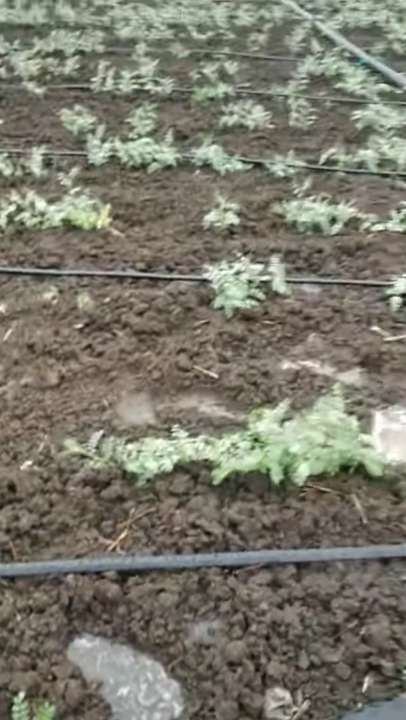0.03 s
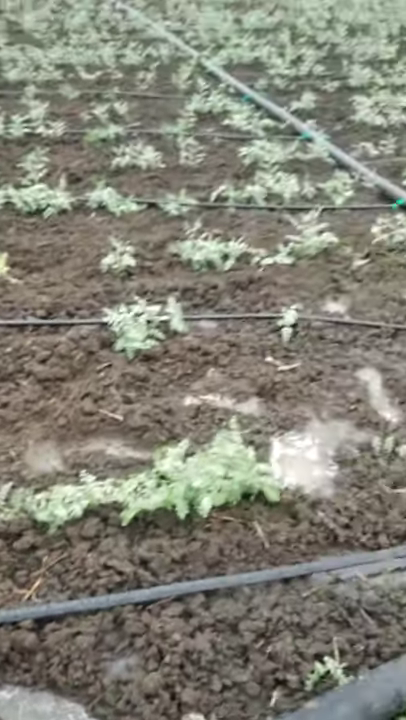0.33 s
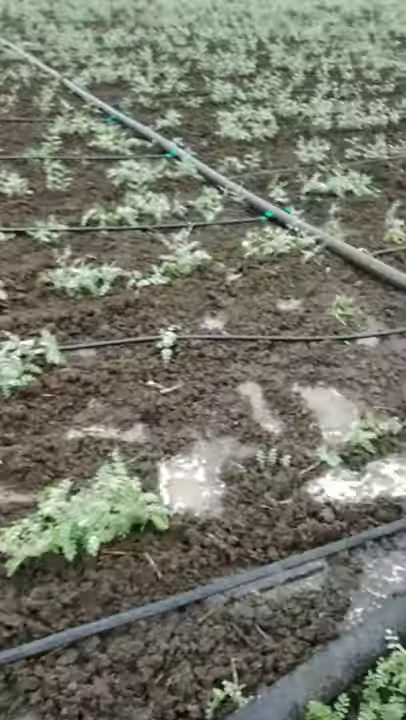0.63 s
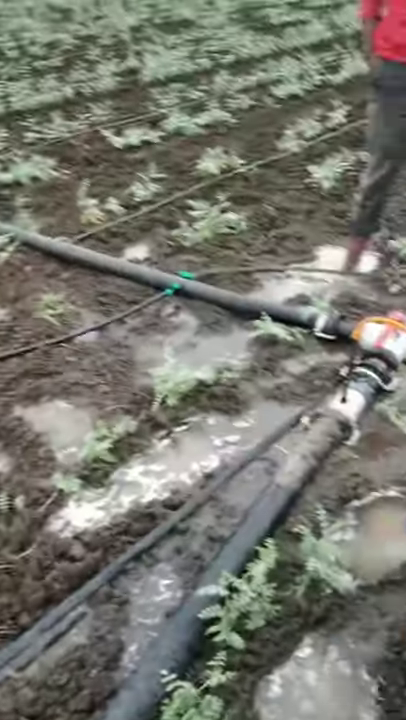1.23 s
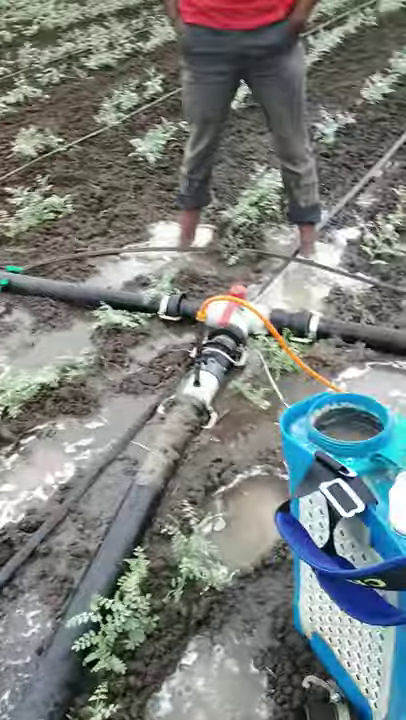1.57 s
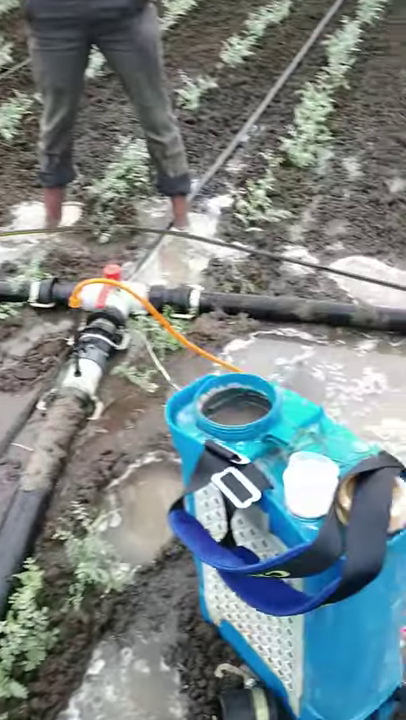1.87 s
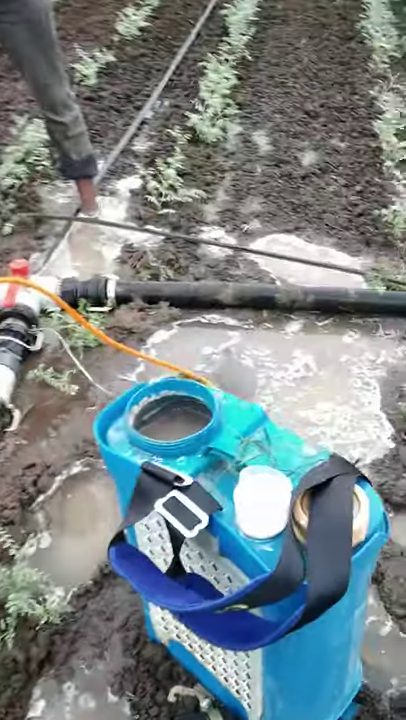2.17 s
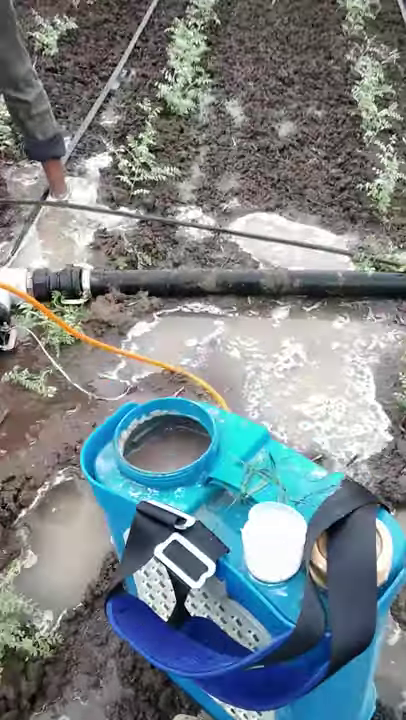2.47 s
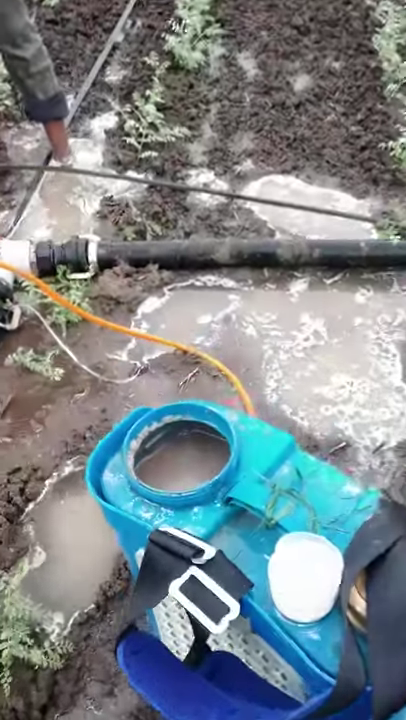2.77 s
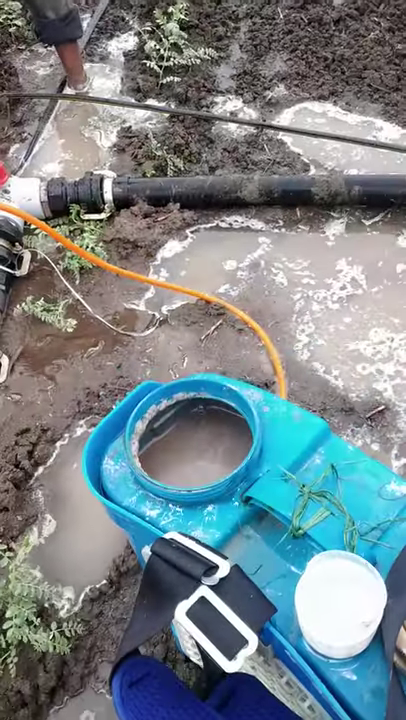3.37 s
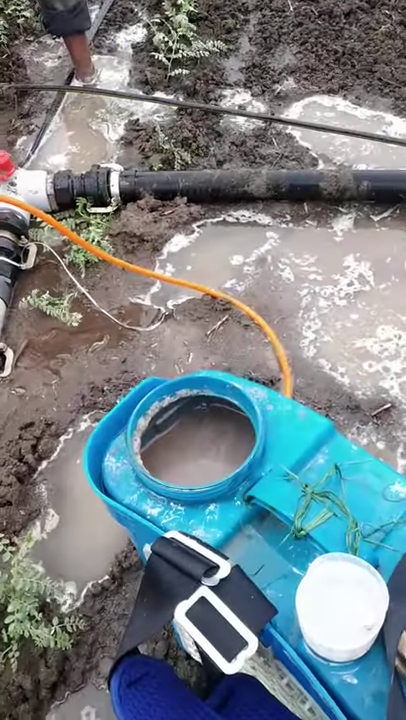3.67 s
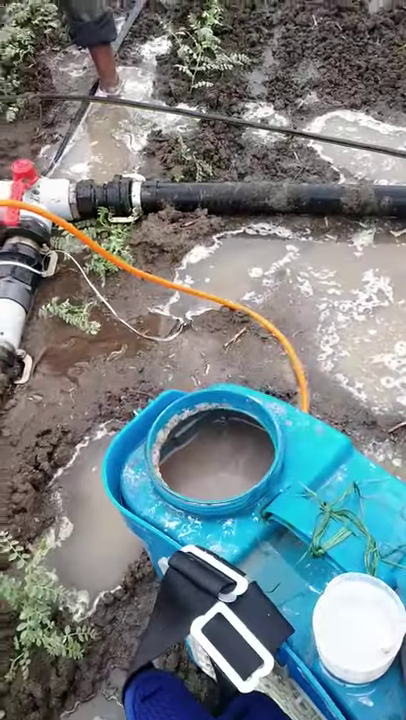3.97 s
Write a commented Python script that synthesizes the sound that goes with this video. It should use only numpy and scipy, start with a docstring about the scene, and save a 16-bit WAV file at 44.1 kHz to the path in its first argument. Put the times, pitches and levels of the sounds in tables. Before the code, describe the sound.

A small electric pump on a sprayer tank hums and buzzes outdoors without a break, its valves rattling rapidly. Water churns inside and a pipe joint hisses faintly while the microphone approaches and the hum swells.

```python
"""A wet field, where a battery sprayer's diaphragm pump runs as the microphone turns and moves up to it.
The motor shaft gives a strong hum on its fourth order; higher orders knock and buzz in the tank and
whirr in the casing. Valves rattle on every turn, partly in a pattern three turns long.
Water churns in the pump, booms in the tank and hisses faintly at a pipe joint."""
import sys
import numpy as np
from scipy import signal
from scipy.fft import rfft, irfft, next_fast_len
from scipy.io import wavfile
from scipy.ndimage import map_coordinates

SR = 44100
rng = np.random.default_rng(int(sys.argv[2]) if len(sys.argv) > 2 else 0)


def pcm_store(signal):
    """Save signal as 16-bit PCM."""
    levels = np.round(np.clip(np.atleast_2d(signal), -1, 1) * 32767)
    wavfile.write(sys.argv[1], SR, levels.astype(np.int16).T)


N = 176400
TIME = np.arange(N) / SR
SHAFT_HZ, DRIFT_HZ, FLUTTER_HZ = 64.66, 0.0398, 0.101  # turns a second; slow and quick unsteadiness
SWEEP_TURNS = 11.33  # each knock sweeps down: an order arrives late by this over its square


# The body of the hum. Each row: shaft order, relative level in dB.
HUM_ORDERS = [(2, -49), (3, -14.5), (4, 1), (5, -20)]
# A swell on the fifth order. Each row: time in seconds, gain in dB.
FIFTH_SWELL = [(.2, 0.5), (1.3, 3), (1.8, 4), (2.6, -3), (3.4, 0)]

def motor_hum(turns, approach_db):
    """The shaft's low orders; the fourth follows the approach fully, the others partly."""
    fifth_db, = curves(FIFTH_SWELL)
    side_db = 0.72 * approach_db
    swell_db = {4: approach_db, 5: side_db + fifth_db}
    return sum(partial(turns, k, db + swell_db.get(k, side_db), waver_db=0.11, lead=SWEEP_TURNS / k)
               for k, db in HUM_ORDERS)


# The tone of the knock. Each row: shaft order, relative level in dB.
KNOCK_ORDERS = [(6, -25), (7, -20), (8, -20), (9, -20.5), (10, -22.5), (11, -26), (12, -27.5), (13, -23.5),
                (14, -21)]
# The knock loosening. Each row: time in seconds, delay in turns per order, odd-order shift in cycles.
KNOCK_SMEAR = [(.3, .01, 0), (1.3, .045, .03), (2.3, .07, .16)]

def diaphragm_knock(turns, approach_db):
    """The diaphragm knocks; close up, the tank draws each knock out and the return stroke splits it."""
    smear, split = curves(KNOCK_SMEAR)
    out = 0
    for k, db in KNOCK_ORDERS:
        level_db = db + 0.73 * approach_db - ground_dip(k * SHAFT_HZ, TIME, width_hz=74)
        lead = SWEEP_TURNS / k + smear * (k - 10) ** 2 / 2 + split * (k % 2)
        out = out + partial(turns, k, level_db, waver_db=0.63, lead=lead)
    return out


# The colour of the buzz. Each row: frequency in Hz, relative level of an order there in dB.
BUZZ_COLOUR = [(970, -29.5), (1100, -28.5), (1230, -38), (1350, -30.5), (1420, -43.5), (1620, -39)]
# The buzz rising as the tank comes round. Each row: time in seconds, gain in dB.
BUZZ_FADER = [(0, -6), (1, -7), (1.7, -6), (2.1, -3), (2.6, -3), (4, -3)]

def tank_buzz(turns, approach_db):
    """The tank wall buzzes on the shaft's middle orders, growing a little with nearness."""
    gain_db = curves(BUZZ_FADER)[0] + 0.1 * approach_db
    return sum(partial(turns, k, along(BUZZ_COLOUR, k * SHAFT_HZ) + gain_db,
                       waver_db=1.7, lead=rng.random()) for k in range(15, 26))


# The colour of the whirr. Each row: frequency in Hz, relative level of an order there in dB.
WHIRR_COLOUR = [(1680, -44), (1770, -35), (1875, -43.5), (1940, -35), (2010, -42.5), (2130, -43),
                (2260, -40), (2390, -38.5), (2455, -38), (2540, -40.5), (2700, -38.5), (2800, -43.5),
                (3230, -48.5), (3600, -76)]

def casing_whirr(turns):
    """The motor casing whirrs on the shaft's high orders."""
    return sum(partial(turns, k, along(WHIRR_COLOUR, k * SHAFT_HZ), waver_db=2.46, lead=rng.random())
               for k in range(26, 54))


# The colour of the churn. Each row: frequency in Hz, relative level in dB.
CHURN_COLOUR = [(200, -52), (350, -14), (450, -4.5), (600, -5.5), (860, 2.5), (1000, -9), (1150, -11),
                (1300, -6.5), (1550, -11.5), (2500, -35), (6000, -63)]
# The ride on the churn. Each row: time in seconds, level in dB.
CHURN_FADER = [(0, -41.5), (1.15, -43), (1.7, -37.5), (2.3, -39), (4, -37)]

def water_churn(turns, flow):
    """Water pushed through the pump chamber, slightly hollowed by the ground reflection."""
    churn = noise(colour(CHURN_COLOUR), flow * grit(turns, each_turn=0, each_pattern=.25))
    hz, seconds, spectrum = signal.stft(churn, SR, nperseg=2048)
    dip_db = 0.24 * ground_dip(hz[:, None], seconds, width_hz=115)
    hollowed = signal.istft(spectrum * amp(-dip_db), SR, nperseg=2048)[1][:, :N]
    return fader(CHURN_FADER) * hollowed


# The colour of the boom. Each row: frequency in Hz, relative level in dB.
BOOM_COLOUR = [(25, -57), (55, -49), (85, -25.5), (130, -14.5), (175, -15.5), (235, 2.5), (285, -0.5),
               (350, -8.5), (450, -16.5), (800, -50)]

def tank_boom(flow, approach_db):
    """Water booms in the tank, pulsing with the flow and growing with nearness."""
    return amp(-40.5 + 0.87 * approach_db) * noise(colour(BOOM_COLOUR), flow * rng.standard_normal((2, N)))


# The colours of the rattle and the brighter rasp. Each row: frequency in Hz, relative level in dB.
RATTLE_COLOUR = [(300, -38), (1000, 1), (1550, -19.5), (1800, 4), (2300, 0.5), (2800, -3.5), (3150, -2.5),
                 (3500, -10), (3750, -10.5), (4900, -32), (7000, -29), (15000, -34)]
RASP_COLOUR = [(1500, -48), (2800, -3.5), (3100, 1.5), (3450, -1.5), (3750, -10.5), (4400, -12),
               (4850, -7.5), (5300, -30), (6200, -13), (7500, -23.5), (15000, -61)]
# Their rides; the rasp opens as the microphone turns to the pump. Each row: time in seconds, level in dB.
RATTLE_FADER = [(0, -40.5), (.8, -41), (1.7, -42.5), (2.4, -39), (4, -39)]
RASP_FADER = [(0, -54), (.7, -45.5), (.95, -45), (1.25, -46.5), (1.55, -43.5), (2.3, -43.5), (2.8, -43),
              (4, -43)]
# Casing resonances that face the microphone in passing. Each row: centre in Hz, width in Hz,
# loudest moment in seconds, half-length in seconds, level in dB.
CASING_RINGS = [(2014, 136, 0.99, 0.84, -42), (3188, 120, 1.79, 0.85, -44.5)]

def valve_rattle(turns):
    """On each stroke the valves rattle, the pump head rasps and the casing rings."""
    closings = strokes(turns, decay_turns=.15, second_db=-1.5, second_at=.57, floor=.33)
    chatter = lambda steady: (closings + steady) * grit(turns, each_turn=.16, each_pattern=.22)
    out = fader(RATTLE_FADER) * noise(colour(RATTLE_COLOUR), chatter(steady=0))
    out += fader(RASP_FADER) * noise(colour(RASP_COLOUR), chatter(steady=0.78))
    for centre, width, loudest_s, half_s, db in CASING_RINGS:
        resonance = lambda hz: 1j * hz * width / (centre ** 2 - hz ** 2 + 1j * hz * width)
        ring = lambda hz: resonance(hz) * np.exp(-((hz - centre) / (3 * width)) ** 2)
        facing = np.exp(-((TIME - loudest_s) / half_s) ** 6 / 2)
        out += amp(db) * facing * noise(ring, chatter(steady=0))
    return out


# The colour of the hiss. Each row: frequency in Hz, relative level in dB.
HISS_COLOUR = [(500, -5), (3000, 11.5), (5200, 5), (6100, 5), (6600, -5), (7100, -2.5), (8500, 1.5),
               (9800, 0.5), (11500, 1), (13000, 1), (14200, 1.5), (15200, 6.5), (15800, 0)]
# The ride on the hiss. Each row: time in seconds, gain in dB.
HISS_FADER = [(0, -45.5), (.5, -44.5), (1, -42.5), (1.6, -41.5), (2.2, -44), (4, -44)]
# A glance off wet soil, sweeping up as the microphone turns. Each row: time and delay in seconds, gain.
SOIL_ECHO = [(0, 0.00013, 0.15), (.7, 0.000095, 0.2), (1.4, 0.000054, 0.23), (2.3, .000047, 0.042)]
# A bounce off the tank, growing on arrival. Each row: time in seconds, gain.
TANK_ECHO = [(1.5, 0.055), (2.7, 0.16)]

def joint_hiss(turns, tank_delay_s=0.000363):
    """Fine spitting hiss at the joint, pulsing faintly with the pump and reflected by soil and tank."""
    soil_delay_s, soil_gain = curves(SOIL_ECHO)
    tank_gain, = curves(TANK_ECHO)
    spits_db = 3.1 * rng.standard_normal(N) + 1.5 * wobble(400) + 0.56 * np.cos(4 * np.pi * turns)
    hiss = noise(colour(HISS_COLOUR), amp(spits_db) * rng.standard_normal((2, N)))
    delayed = np.arange(N) - soil_delay_s * SR
    hiss += soil_gain * np.array([map_coordinates(port, [delayed]) for port in hiss])
    hiss += tank_gain * filtered(hiss, lambda hz: np.exp(-2j * np.pi * hz * tank_delay_s))
    return fader(HISS_FADER) * amp(0.53 * wobble(16)) * hiss


# A notch sliding down through the mids. Each row: time in seconds, centre in Hz, depth in dB.
GROUND_NOTCH = [(0, 747, 12), (.55, 760, 6), (.82, 630, 8), (1.15, 622, 10), (1.5, 577, 7), (1.9, 509, 5),
                (2.6, 447, 3.5)]

def ground_dip(hz, seconds, width_hz):
    """Loss in dB from the ground reflection, which cancels at the notch and reinforces 140 Hz below."""
    notch_hz, depth_db = curves(GROUND_NOTCH, seconds)
    bell = lambda f: np.exp(-((f - notch_hz) / width_hz) ** 2)
    return depth_db * (bell(hz) - 0.2 * bell(hz + 140))


# The lean of the stereo image. Each row: frequency in Hz, left minus right in dB.
PORT_BALANCE = [(260, -0.3), (550, 0.5), (850, 0.5), (1200, -1), (1900, 4), (2600, 7), (3200, -1),
                (4500, 0), (5300, -3.5), (6200, -8.5), (7500, -6.5), (11000, -6), (14000, -6), (15300, -10)]
# The left port's lead over the right. Each row: frequency in Hz, phase in radians.
PORT_PHASE = [(20, 0), (250, 0.19), (600, -0.1), (1200, 0.5), (2500, 1.15), (3100, 0.03), (4300, 1.7),
              (5500, 0.6), (7200, 2.5), (11000, 1.5), (15000, 4.5)]

def microphone(sound):
    """Two ports hear each frequency at a different level and phase."""
    sides = np.array([[.5], [-.5]])
    gain = lambda hz: amp(sides * along(PORT_BALANCE, hz))
    return filtered(sound, lambda hz: gain(hz) * np.exp(1j * sides * along(PORT_PHASE, hz)))


# Narrow lows, wide highs. Each row: frequency in Hz, left-right correlation.
PORT_LIKENESS = [(300, 0.99), (600, 0.83), (1000, 0.59), (2000, 0.34), (3200, 0.42), (5000, 0.15),
                 (15000, 0.13)]

def spread(hz):
    """Angle that sets how unlike the two channels are."""
    return np.arccos(np.clip(along(PORT_LIKENESS, hz), -1, .999)) / 2


def partial(turns, order, db, waver_db, lead):
    """One wavering shaft order, lead cycles ahead, reaching the two ports out of step."""
    phase = 2 * np.pi * ((order * turns + lead) % 1)
    apart = spread(order * SHAFT_HZ) * np.array([[-1], [1]])
    return np.sqrt(2) * amp(db + waver_db * wobble(9)) * np.sin(phase + apart)


def strokes(turns, decay_turns, second_db, second_at, floor):
    """Envelope of two valve closings a turn, each dying away over a steady floor."""
    envelope = floor
    for lag, db in [(0, 0), (second_at, second_db)]:
        at = turns + 1 - lag
        strength = amp(db + rng.standard_normal(1024))[at.astype(int)]  # 1 dB of scatter
        envelope = envelope + strength * np.exp(-(at % 1) / decay_turns)
    return envelope


def grit(turns, each_turn, each_pattern):
    """Flat stereo noise: shares of it recur every turn and every third turn, the rest is fresh."""
    out = np.sqrt(1 - each_turn - each_pattern) * rng.standard_normal((2, N))
    for share, period in [(each_turn, 1), (each_pattern, 3)]:
        orders = np.exp(2j * np.pi * rng.random((2, 240 * period)))
        cycle = irfft(orders, 8192 * period)
        position = (turns / period % 1 * cycle.shape[1]).astype(int)
        out += np.sqrt(share) * unit(cycle[:, position])
    return out


def noise(response, excitation):
    """Excitation coloured by a response and spread in stereo, at rms 1."""
    width = lambda hz: np.array([np.cos(spread(hz)), np.sin(spread(hz))])
    mid, side = filtered(excitation, lambda hz: response(hz) * width(hz))
    return unit(np.array([mid + side, mid - side]))


def filtered(x, response):
    """x through a frequency response."""
    size = next_fast_len(N + 8192)
    return irfft(rfft(x, size) * response(np.fft.rfftfreq(size, 1 / SR)), size)[..., :N]


def wobble(rate):
    """A smooth random curve, rate knots a second."""
    at = np.arange(0, N + 64, 64)
    coarse = map_coordinates(rng.standard_normal(2048), [at * rate / SR], mode="wrap")
    return np.interp(np.arange(N), at, coarse)


def curves(rows, seconds=TIME):
    """A curve for each column after the time."""
    times, *columns = np.transpose(rows)
    return [np.interp(seconds, times, column) for column in columns]


def along(points, hz):
    """(Hz, value) points read on a log axis."""
    freqs, values = np.transpose(points)
    return np.interp(np.log(hz + 1), np.log(freqs + 1), values)


def colour(points):
    return lambda hz: amp(along(points, hz))


def fader(rows):
    return amp(curves(rows)[0])


def amp(db):
    return 10 ** (np.asarray(db) / 20)


def unit(x):
    return x / np.sqrt(np.mean(x ** 2) + 1e-20)


# The move up to the pump. Each row: time in seconds, gain on the hum in dB.
NEARNESS = [(0, -24.5), (.6, -23), (1.05, -20.5), (1.5, -20), (2, -18.5), (2.6, -17), (3.1, -16),
            (4, -16.5)]

def scene():
    """All layers follow one shaft and reach two microphone ports."""
    turns = np.cumsum(SHAFT_HZ + DRIFT_HZ * wobble(9) + FLUTTER_HZ * wobble(60)) / SR
    near_db, = curves(NEARNESS)
    close_db = near_db.max()
    approach_db = near_db - close_db
    pitched = motor_hum(turns, approach_db) + diaphragm_knock(turns, approach_db)
    pitched += tank_buzz(turns, approach_db) + casing_whirr(turns)
    flow = strokes(turns, decay_turns=.18, second_db=-1, second_at=.6, floor=.5)
    water = water_churn(turns, flow) + tank_boom(flow, approach_db)
    return microphone(amp(close_db) * pitched + water + valve_rattle(turns) + joint_hiss(turns))


def record(dry, top_hz=15780):
    """A hard cut takes off the very top."""
    return filtered(dry, lambda hz: hz < top_hz)


dry = scene()
out = record(dry)
pcm_store(out)
```